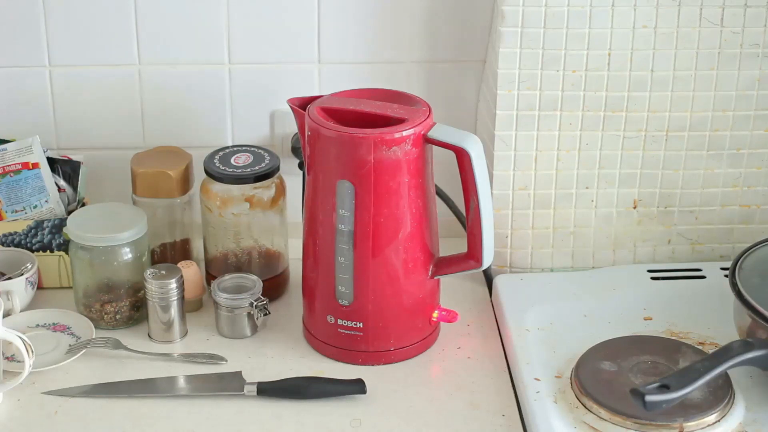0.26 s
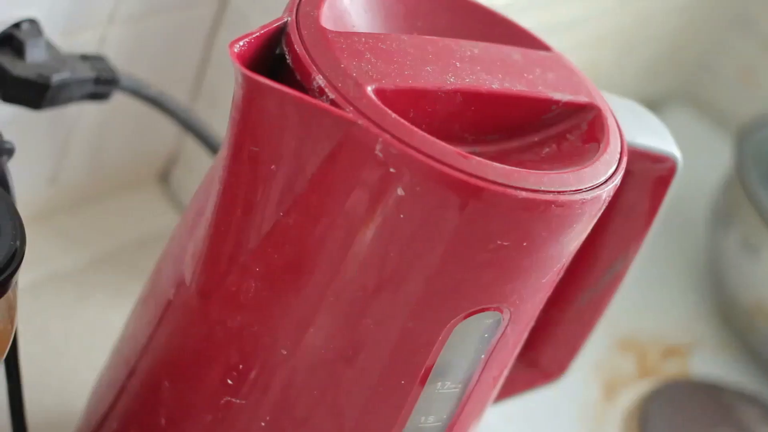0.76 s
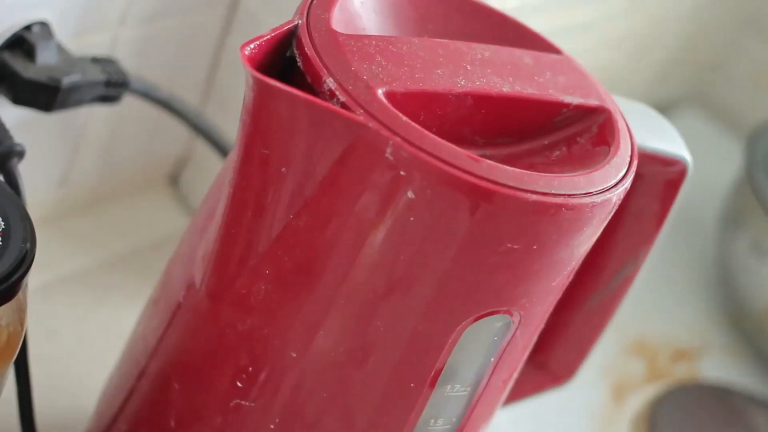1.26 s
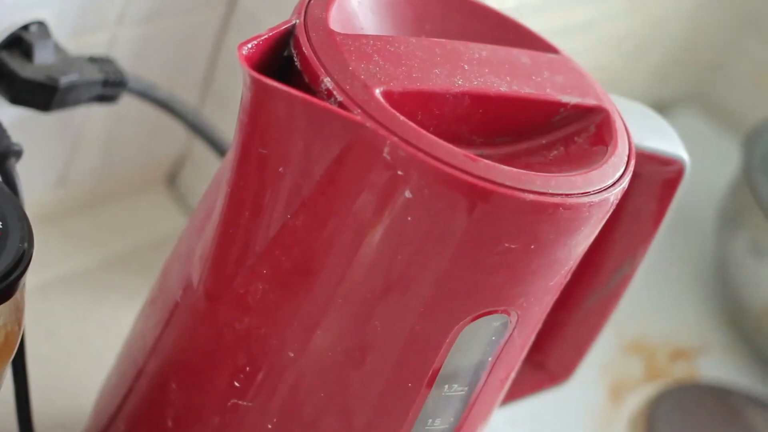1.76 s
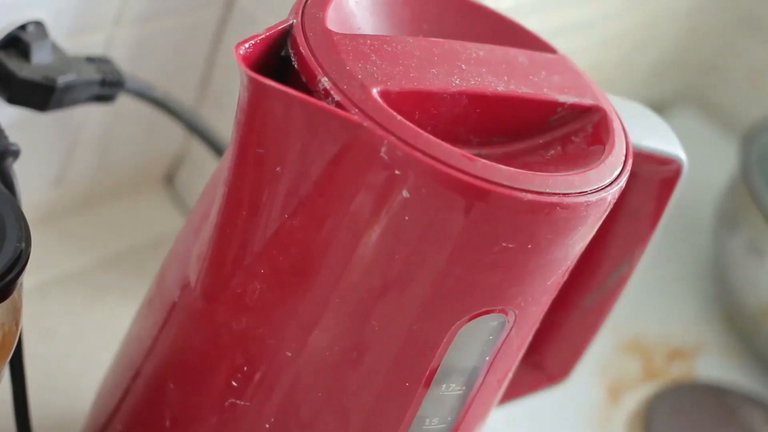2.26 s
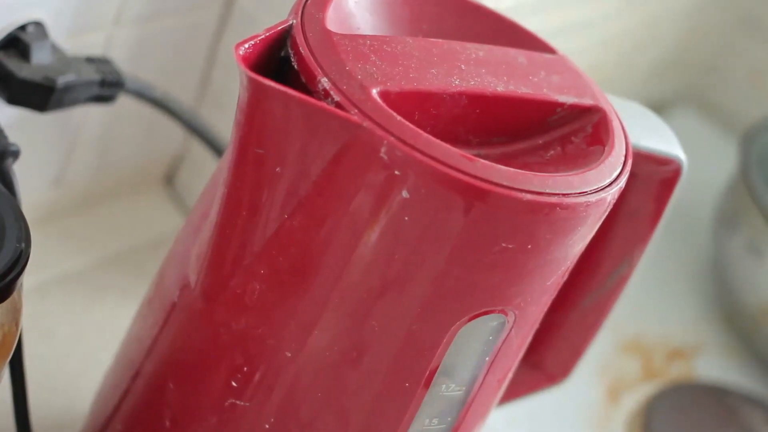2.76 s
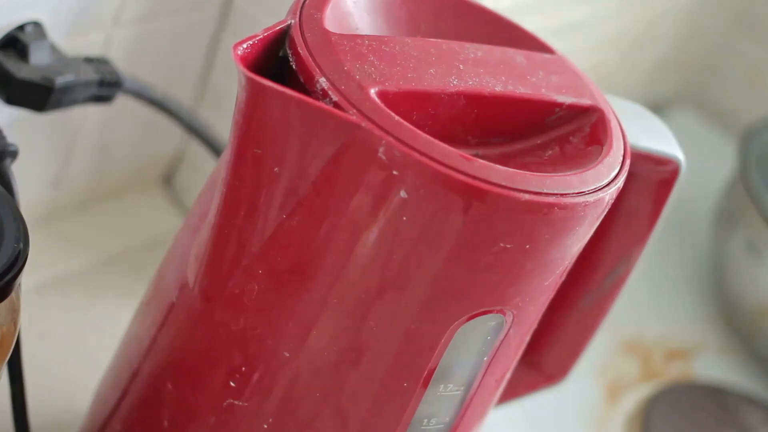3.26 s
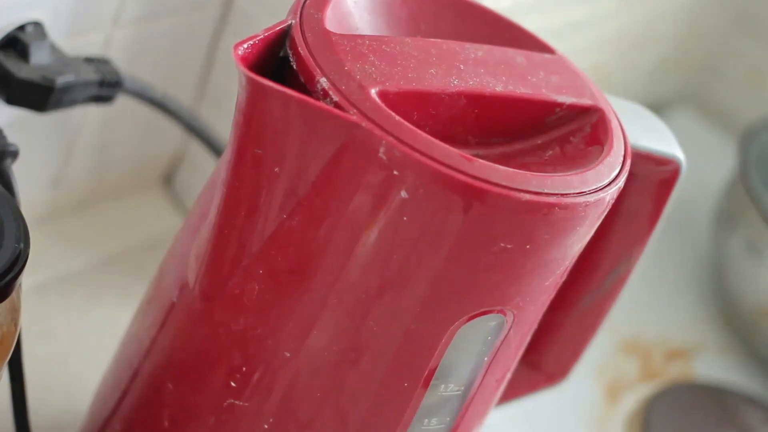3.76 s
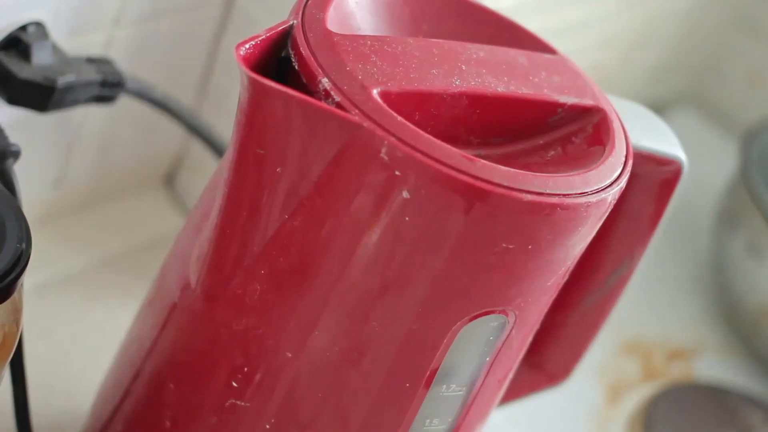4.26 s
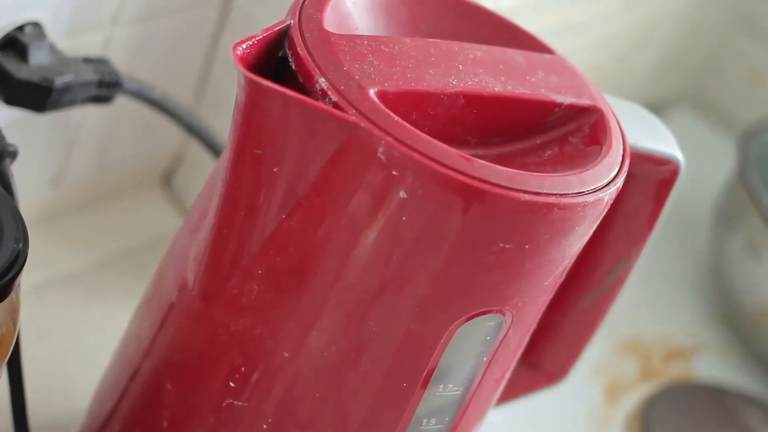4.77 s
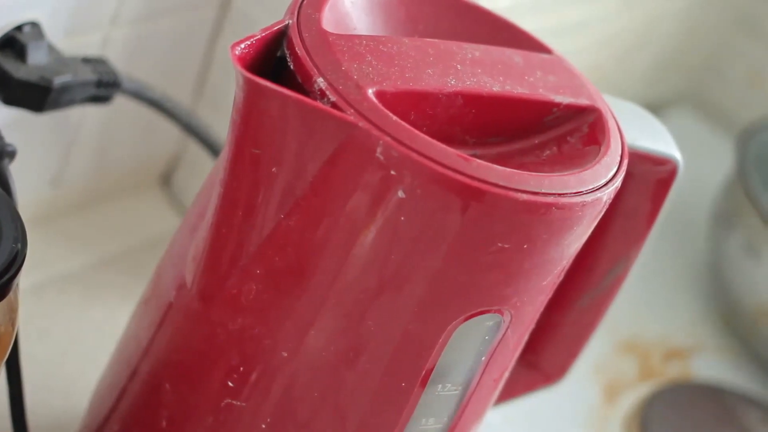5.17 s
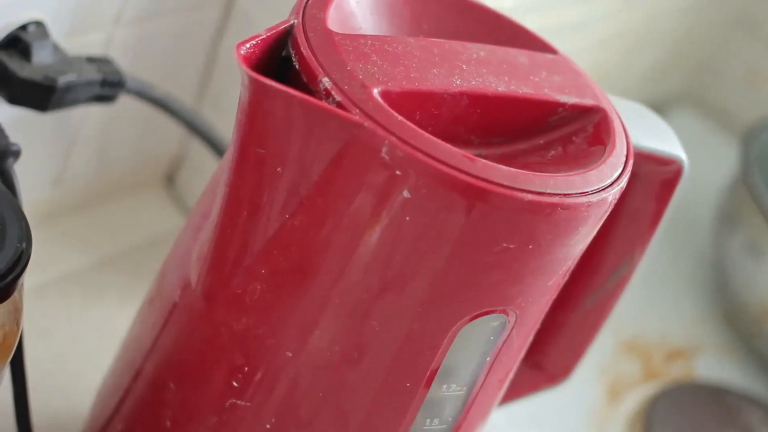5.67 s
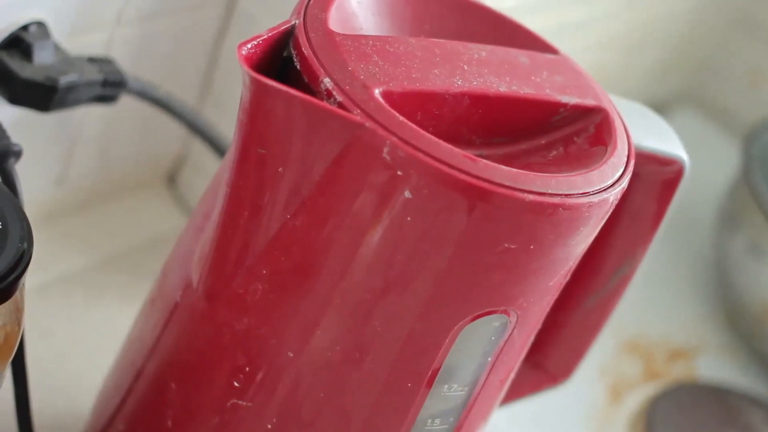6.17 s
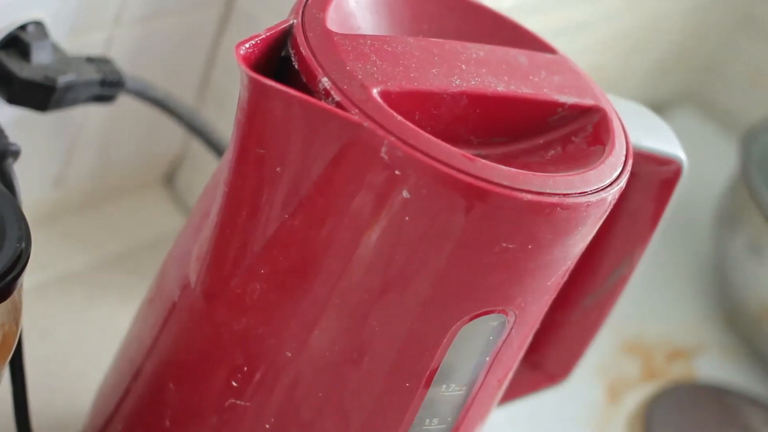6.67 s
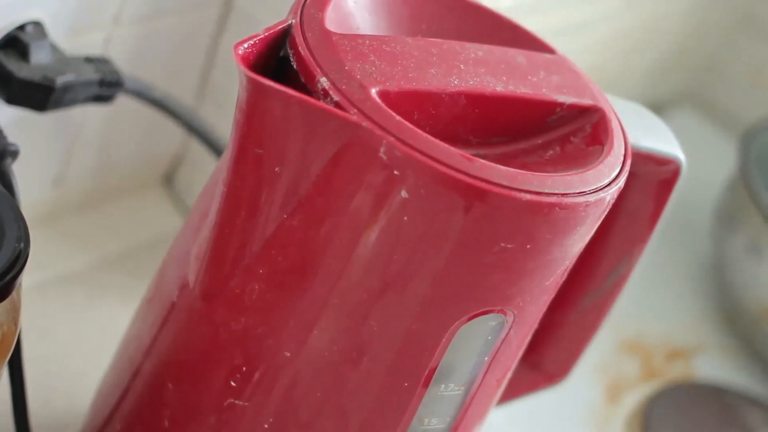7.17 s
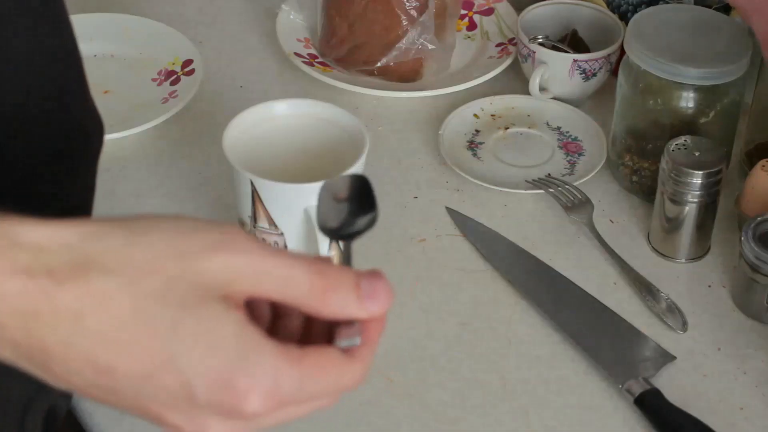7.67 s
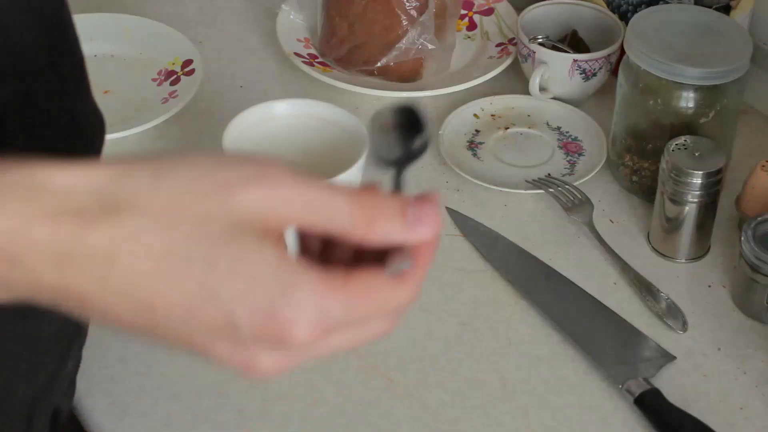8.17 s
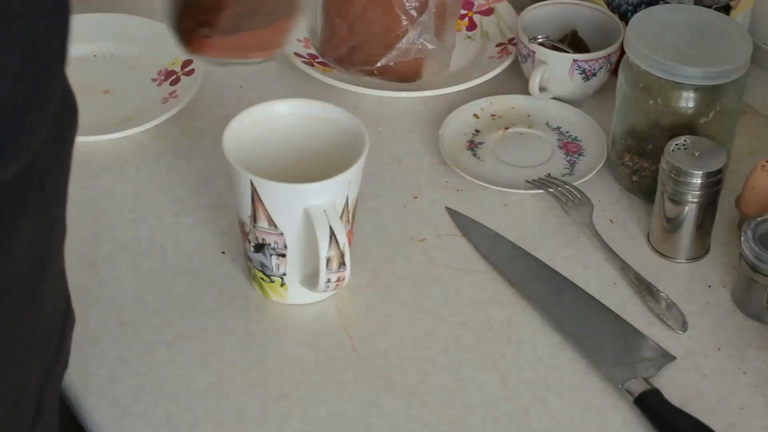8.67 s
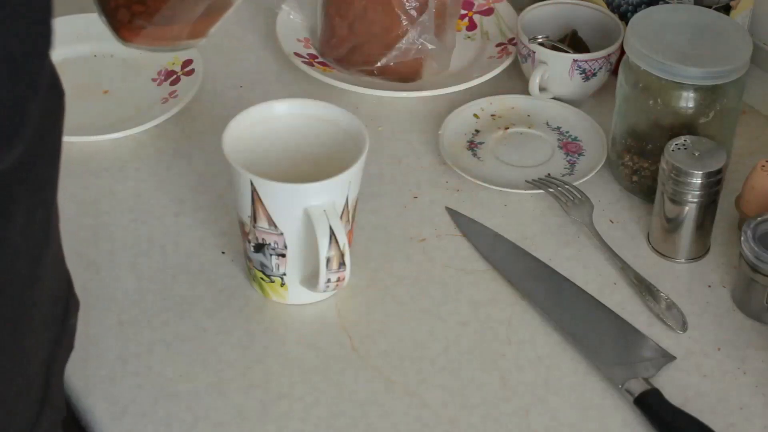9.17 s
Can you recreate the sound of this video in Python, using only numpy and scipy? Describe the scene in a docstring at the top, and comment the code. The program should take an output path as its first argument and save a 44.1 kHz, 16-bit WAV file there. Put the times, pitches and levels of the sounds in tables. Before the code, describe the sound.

In a small tiled kitchen, a boiling electric kettle is heard briefly from across the room as a smooth rush, then abruptly close: heavy low rumble, plopping bubbles, splashes and thin steam hiss. Its switch snaps off loudly with a short echo, steam gushes, and the boil gradually weakens. A sudden cut leaves a quiet room hum, soft hand rustles and small sharp clicks of a spoon and jar.

```python
"""A plastic kettle boils in a tiled kitchen: first a smooth rush of noise, heard from across the room.
Then close by: noise bursts make the rumble and splashes, short rising tones pop, low rings thump, steam hisses.
Its switch snaps with short noise bursts and an echo; the steam gushes and sings in narrow bands as the boil fades.
The sound then cuts to the quiet kitchen's hum, where hands handle a spoon and a jar:
soft thuds and rustles of filtered noise, and ticks and snaps made of blows that stir resonances."""
import sys
import numpy as np
from scipy import signal
from scipy.fft import rfft, irfft, next_fast_len
from scipy.io import wavfile
from scipy.ndimage import uniform_filter1d, map_coordinates

SR = 44100
rng = np.random.default_rng(int(sys.argv[2]) if len(sys.argv) > 2 else 0)


def generate_wav(signal):
    """Clip the signal to [-1, 1] and save it as 16-bit WAV at the path in sys.argv[1]."""
    frames = np.transpose(np.atleast_2d(signal))
    scaled = np.clip(frames, -1, 1) * 32767
    pcm = np.round(scaled).astype(np.int16)
    wavfile.write(sys.argv[1], SR, pcm)


N = 415422  # length in samples

CLOSE_S, QUIET_S = .533, 7.304  # start of the close kettle and of the quiet kitchen
SPLASH_FOLLOWS = 0.73  # splashes and chance pops fade this many dB per dB of vigour

# How hard the water boils: t/s, rumble level/dB (before swells, dips and sway)
VIGOUR = [(.55, -30.5), (1.6, -28.5), (2.6, -29.5), (3.6, -31), (4.6, -32.5), (5.6, -34.5), (6.5, -37),
          (7.3, -38.5)]
# Bubbles bursting at set times: t/s, level/dB, starting f/Hz, chirp level/dB, chirp starting f/Hz, spray level/dB
# (chirp and spray count from the burst's own level)
POPS = [(0.5517, -36, 517, -11, 1510, -34), (0.573, -33, 810.0, -13.0, 3590.0, -26.0),
        (0.594, -25, 1440, -8, 2310, -27.0), (0.6086, -36, 1680.0, -12.0, 3000.0, -25.0),
        (0.6787, -31, 810.0, -12.0, 2420.0, -25.0), (0.719, -29.5, 610, -9, 1350, -39),
        (0.7315, -30, 1070.0, -16, 3820, -28.0), (0.8078, -28, 1340.0, -11.0, 2380.0, -31.0),
        (0.906, -23.5, 1910, -14, 2480.0, -30.0), (0.9623, -23, 1370, -5.0, 2470.0, -24),
        (1.0809, -20, 1800, -8, 3240.0, -22), (1.0927, -29, 810, -14.0, 2300.0, -28.0),
        (1.117, -26, 1090.0, -8.0, 2960.0, -28.0), (1.169, -41, 960, -6, 1460, -34),
        (1.1726, -25, 1440, -22, 2330.0, -33.0), (1.2105, -31, 810, -15.0, 2990.0, -29.0),
        (1.2257, -27, 1400.0, -14.0, 2690.0, -29.0), (1.3044, -33, 1330.0, -13.0, 2500.0, -26.0),
        (1.3185, -35, 600, -7, 1330, -34), (1.3338, -33, 950, -9, 1250, -34),
        (1.467, -21, 1800, 4.5, 2940, -26), (1.499, -29, 760, -11, 1100, -36),
        (1.533, -39, 830.0, -12.0, 2840.0, -27.0), (1.5691, -25, 573, -14, 1274, -34),
        (1.5828, -37, 1570.0, -9.0, 2190, -29.0), (1.591, -24, 690, -16, 1760, -34),
        (1.639, -29, 1850.0, -8, 2370.0, -29.0), (1.671, -22.5, 1130.0, -12.0, 2580.0, -33.0),
        (1.723, -26, 1500, -18.0, 3110.0, -33.5), (1.9086, -23.5, 1610, -5, 2440.0, -29.0),
        (1.9441, -23.5, 520, -10, 1170, -34), (2.1474, -26.5, 604, -3, 1640, -34),
        (2.205, -27, 1350.0, -5, 2810.0, -27.0), (2.2613, -25.5, 1740, -10, 2300.0, -22.0),
        (2.316, -20.5, 1060, -2, 2700.0, -24.5), (2.3159, -27, 520, -2, 1290, -34),
        (2.3364, -28, 1730.0, -3, 3370.0, -23.0), (2.375, -31, 510, -16, 1490, -34),
        (2.408, -40, 794, -15, 1480, -34), (2.4352, -26.5, 580, -13, 1160, -34),
        (2.442, -29, 1250.0, 1, 2800, -22.0), (2.4756, -26, 533, -12, 1100, -34),
        (2.5477, -23.5, 885, -13.0, 2310.0, -29.0), (2.567, -26, 1450.0, -7.0, 2200.0, -22.0),
        (2.6483, -28.5, 2060, -10.0, 2200.0, -31), (2.6656, -29, 1820.0, -13, 2380.0, -26.0),
        (2.7525, -24, 1700, -10.0, 2970.0, -25.0), (2.7989, -31, 1210.0, 1, 3270.0, -25.0),
        (2.8708, -28.0, 825, 1, 2200.0, -19), (2.8996, -28.5, 950, -14.0, 2490.0, -26.0),
        (2.9863, -25, 1550, -17, 3460.0, -28.0), (2.9995, -34, 1420.0, -15, 2200.0, -28.0),
        (3.0821, -34, 586, -18, 2400, -36), (3.114, -28, 930, -8, 2270, -34),
        (3.118, -31, 1330.0, -6, 2360.0, -30.0), (3.1748, -28, 900.0, -14.0, 2200.0, -26.0),
        (3.2116, -30, 1810.0, 3, 2500, -13.0), (3.218, -24, 770, -9, 1380, -34),
        (3.2267, -23, 1340, -14.0, 2200.0, -30.0), (3.2593, -25, 1130, -11.0, 2610.0, -24.0),
        (3.2823, -33, 1820.0, -17, 2690.0, -27.0), (3.294, -32, 650, -9, 1100, -34),
        (3.3034, -33, 1170, -14, 2370.0, -25.0), (3.3586, -30, 1490.0, -12.0, 3270.0, -25.0),
        (3.4488, -31, 750, -13, 1850, -34), (3.4705, -35, 1390.0, -7.0, 3250.0, -26.0),
        (3.494, -24.5, 925, -12.0, 2900.0, -25.0), (3.537, -29.5, 1280.0, -14.0, 2920.0, -27.0),
        (3.5422, -31, 676, -12.5, 1240, -34), (3.5514, -31.0, 1110.0, -14, 2520.0, -27.5),
        (3.5642, -32.0, 1790.0, -13.0, 3190.0, -21.0), (3.625, -24, 780, -17, 3170, -32.0),
        (3.6473, -25.5, 1410.0, -14.0, 2200.0, -28.0), (3.7135, -30, 980.0, -13, 3850.0, -27.0),
        (3.7329, -33, 2090, -15, 2200.0, -21.0), (3.753, -38, 1270.0, -7.0, 2940.0, -20.0),
        (3.8715, -39, 1000, 8, 3000.0, -19.0), (3.9022, -33.0, 1470.0, -10.0, 2200.0, -24.0),
        (3.9238, -23.5, 1860, 0, 2900, -15), (3.948, -28.5, 1930, -9, 2360.0, -24.0),
        (3.9668, -28, 795, -10.0, 2200.0, -24.5), (4.001, -26.5, 1360, -2, 2180, -27),
        (4.04, -32, 804, -11.0, 2780.0, -27.5), (4.0531, -33, 2190.0, -10, 2200.0, -24.0),
        (4.087, -25, 920, -3, 3950.0, -13), (4.103, -31, 1050, -7.5, 3020.0, -28.0),
        (4.1216, -23.5, 826, 1, 2220.0, -15), (4.2653, -33, 1590.0, -8.0, 2440.0, -23.0),
        (4.295, -39, 1110.0, -12.0, 3190.0, -25.0), (4.3856, -28.5, 645, -9, 1180, -34),
        (4.3876, -36, 1170.0, -16.0, 2700.0, -23.0), (4.404, -28, 1410.0, -9.0, 2270.0, -27.0),
        (4.426, -32, 1340.0, -9, 2770.0, -24.0), (4.449, -32.5, 1320.0, -16.0, 2480.0, -24.5),
        (4.5281, -36, 1310.0, -10.0, 2200.0, -26.0), (4.5547, -38, 2200.0, 2, 2300.0, -20.0),
        (4.6001, -30.0, 1730.0, -11, 2490.0, -25.0), (4.6232, -27.0, 870, 2, 2340, -14),
        (4.7851, -35, 610, -16, 1480, -34), (4.7902, -47, 1340.0, -13.0, 4290.0, -23.0),
        (4.8574, -28.5, 920, -11.0, 2240.0, -27.0), (4.9, -33, 1270, -18, 2270.0, -27.0),
        (4.9848, -28, 825, -15.0, 2980.0, -28.5), (5.0207, -28, 800.0, -17.0, 3910.0, -22.0),
        (5.0371, -35, 1500, -11, 2260.0, -22.0), (5.0534, -31, 1780, -12.0, 2410.0, -26.0),
        (5.1248, -30, 1520.0, -15.0, 2290.0, -28.0), (5.211, -36, 1340.0, -13.0, 2200.0, -27.0),
        (5.222, -32, 1050, -18.0, 2410.0, -30.0), (5.2397, -37, 1030, -16, 2300.0, -23.0),
        (5.3117, -31, 656, -13, 1400, -34), (5.375, -29, 1500, -18, 2930.0, -25.0),
        (5.423, -35, 1860.0, -12.0, 2230.0, -24.0), (5.455, -28.5, 850.0, -10.0, 2360.0, -27.0),
        (5.482, -29, 950, -8, 1230, -34), (5.4852, -36, 1730.0, -10.5, 2720.0, -27.5),
        (5.5335, -28.5, 1080, -4, 2370.0, -24.0), (5.6649, -32, 520, -10, 1420, -34),
        (5.687, -33.5, 1730.0, 6, 3900, -16.0), (5.8175, -32.5, 1080, -4, 2510.0, -32.0),
        (5.869, -30, 1350.0, -13, 2210.0, -24.0), (5.9598, -33, 550, -13, 2410, -34),
        (5.9762, -44, 1980.0, -10.0, 3890.0, -19.0), (6.0253, -36, 1060, -9.0, 3910.0, -27.0),
        (6.064, -34, 1830, -9.0, 2280.0, -26.0), (6.086, -32.5, 1720.0, -6.5, 2200.0, -14.0),
        (6.1092, -43, 1140.0, -9.0, 2530.0, -23.0), (6.1332, -31, 517, -13, 1550, -34),
        (6.1563, -36, 1440.0, -9.0, 2780.0, -27.0), (6.1813, -29.5, 1260, -6, 2520, -23.0),
        (6.2217, -39, 1640, -15.0, 2200.0, -25.0), (6.2617, -30.5, 800, 9, 1590, -24),
        (6.377, -40, 1500, 5, 5000, -14), (6.3423, -28, 1870, 3, 3050.0, -5),
        (6.393, -37, 1230.0, -13.0, 2200.0, -25.0), (6.4237, -34, 580, -14, 1250, -34),
        (6.431, -36.0, 800.0, -12.0, 2920.0, -25.0), (6.4456, -40, 1170.0, -6.0, 2200.0, -22.5),
        (6.475, -32, 613, -20, 1290, -34), (6.486, -41, 640, -17, 1610, -34),
        (6.573, -39, 1240, -14.0, 2480.0, -24.0), (6.6779, -31, 830.0, -14.0, 2210.0, -24.0),
        (6.693, -32, 1780.0, -10.0, 2470.0, -23.0), (6.713, -31, 1390.0, -11, 2200.0, -22.0),
        (6.7334, -28.5, 940.0, -13.0, 2490.0, -31.0), (6.878, -31, 1420, -2, 2350.0, -15),
        (6.958, -28, 1300, -1.5, 2500, -28), (6.9761, -40, 1450.0, -4.0, 2830.0, -20.0),
        (7.0814, -32, 950, -8, 1330, -34), (7.086, -34.5, 1290.0, 7, 2470, -10),
        (7.1293, -35, 1310, -20.0, 3800.0, -30.0), (7.1458, -35, 577, -18, 1300, -34),
        (7.1524, -49, 1350, -15.0, 2550.0, -22.5), (7.1654, -41, 650, -16, 1710, -34),
        (7.277, -44, 806, -12.0, 2230.0, -23.0)]
# Contacts of the switch: t/s, starting level/dB, time to fall 60 dB/s, tilt/dB per octave
SWITCH = [(1.7337, -26, 0.03, -1), (1.7347, -15, 0.064, 3), (1.7384, -5, .014, -.3), (1.7396, -3, 0.016, 2),
          (1.7416, -3, 0.0065, -4), (1.744, -10, 0.019, -1.5)]
SWITCH_OFF_S = SWITCH[0][0]


def amp(db):
    """Turns decibels into a plain gain."""
    return 10 ** (np.asarray(db) / 20)


def unit(x):
    """x scaled to an average (rms) strength of 1."""
    return x / np.sqrt(np.mean(x ** 2) + 1e-20)


def along(points, hz):
    """Reads a curve of (f/Hz, value) points on a log frequency axis."""
    f, v = np.transpose(points)
    return np.interp(np.log(hz + 1), np.log(f + 1), v)


def curves(rows):
    """One value per sample for each column after the time."""
    s, *cols = np.transpose(rows)
    return [np.interp(np.arange(N) / SR, s, c) for c in cols]


def wobble(rate):
    """A smooth random curve around 0, with rate random knots a second."""
    knots = rng.standard_normal(int(N * rate / SR) + 4)
    return map_coordinates(knots, [np.arange(N) * rate / SR])


def swell(s, rise_s, fall_s):
    """A smooth bump of height 1 that peaks at s."""
    late = np.arange(N) / SR - s
    return np.exp(-(late / np.where(late < 0, rise_s, fall_s)) ** 2)


def filtered(x, response):
    """Weights each frequency of x by a response; the padding keeps the end from wrapping round."""
    m = next_fast_len(len(x) + 8192)
    return irfft(rfft(x, m) * response(np.fft.rfftfreq(m, 1 / SR)), m)[:len(x)]


def coloured(x, spectrum):
    """x weighted by the spectrum, rms 1; nothing is kept outside its ends."""
    inside = lambda hz: (hz > spectrum[0][0]) & (hz < spectrum[-1][0])
    return unit(filtered(x, lambda hz: amp(along(spectrum, hz)) * inside(hz)))


def flattened(x):
    """x with its long-term spectrum evened out, ready for a new colour."""
    spectrum = rfft(x)
    smooth_size = uniform_filter1d(np.abs(spectrum), size=2000)
    return unit(irfft(spectrum / (smooth_size + 1e-9), len(x)))


def resonance(hz, width_hz):
    """A body that rings around hz, passing little on both sides."""
    return lambda f: (1j * f * width_hz / (hz * hz - f * f + 1j * f * width_hz)) ** 2


def bands(modes):
    """The summed response of resonances: f/Hz, width/Hz, level/dB."""
    return lambda f: sum(amp(db) * resonance(hz, width_hz)(f) for hz, width_hz, db in modes)


def bursts(count, life_s, spread_db):
    """White noise broken into sudden, dying bursts of unequal size."""
    when, size = rng.random((count, 2)).T
    powers = amp(-spread_db * np.log(0.034 + size)) ** 2
    starts = np.bincount((when * N).astype(int), powers, N)
    power = signal.lfilter([1], [1, -np.exp(-1 / (max(life_s, 1e-4) * SR))], starts)
    return unit(np.sqrt(power) * rng.standard_normal(N))


def add(track, s, sound):
    """Mixes a sound into the track at time s."""
    part = track[round(s * SR):][:len(sound)]
    part += sound[:len(part)]


def echo(sound):
    """The tiled walls answer with fading noise; each frequency dies at its own speed."""
    # f/Hz, time to fall 60 dB/s
    room = [(300, 0.35), (1000, 0.3), (3000, 0.36), (8000, 0.24), (15000, 0.14)]
    hz, t, z = signal.stft(rng.standard_normal(SR // 2), SR, nperseg=256)
    fade = amp(-60 * t / along(room, hz)[:, None])
    tail = signal.istft(z * fade, SR, nperseg=256)[1]
    delayed = np.pad(sound, (220, 0))  # the walls answer 5 ms later
    return signal.fftconvolve(delayed, tail / np.linalg.norm(tail))


def distant_boil():
    """Across the room the walls smooth the boil into a steady rush with faint thin bands."""
    # Colour of the rush: f/Hz, relative level/dB per Hz
    rush_colour = [(15, -64), (25, -46), (59, -6), (99, -9), (118, -2), (146, -19), (175, 3), (208, 1),
                   (236, -10), (293, 2), (344, -14), (385, -8.5), (440, -5), (480, -16), (527, -12),
                   (714, -19.5), (1790, -24.5), (2690, -36), (6050, -41), (7710, -44), (16000, -58)]
    # Faint thin bands: f/Hz, width/Hz, relative level/dB
    whine_bands = [(3780, 140, -9), (5650, 170, -8), (6460, 230, -9), (7660, 45, -1), (7830, 60, -3)]
    whine = amp(-72) * unit(filtered(rng.standard_normal(N), bands(whine_bands)))
    level_db = -39 + .6 * wobble(10)
    return amp(level_db) * coloured(rng.standard_normal(N), rush_colour) + whine


def droplets(count, centre_hz, scatter, cycles, spread_db):
    """Many tiny bubbles in clusters, each ringing a few cycles at its own pitch."""
    when, size = rng.random((count, 2)).T[:, :, None]
    share = np.cumsum(amp(2.4 * wobble(45)))  # bubbles crowd where this climbs fast
    start = np.searchsorted(share, when * share[-1])
    hz = np.clip(centre_hz * np.exp(scatter * rng.standard_normal((count, 1))), 300, 15000)
    step = np.arange(300)  # samples within one ring
    turns = hz * step / SR
    strength = amp(-spread_db * np.log(0.0046 + size)) * np.sqrt(hz)
    ring = strength * np.sin(2 * np.pi * turns) * np.exp(-turns / cycles)
    return unit(np.bincount((start + step).ravel(), ring.ravel(), N + 301)[:N])


def wake():
    """Gain of the churning water that starts with each burst in POPS and settles."""
    wake_db, settle_s = -11, 0.016  # under the burst's level
    s, db = np.transpose(POPS)[:2]
    starts = np.bincount((s * SR).astype(int), amp(db + wake_db) ** 2, N)
    return np.sqrt(signal.lfilter([1], [1, -np.exp(-2 / (settle_s * SR))], starts))


def rumble(calm_db):
    """Steam bubbles collapse low in the water and shake the kettle; its lowest part fades more slowly."""
    # Water and kettle wall: f/Hz, relative level/dB per Hz
    water_colour = [(13, -51), (22, -23.5), (64, -5.5), (98, -12), (129, -2), (196, -3.5), (237, -2),
                    (277, -2), (360, -6.5), (414, -7), (447, -8.5), (556, -13.5), (592, -12), (713, -20),
                    (900, -22.5), (1170, -40), (1980, -120)]
    # Kettle and counter resonances: f/Hz, width/Hz, level over the rumble/dB
    shell_modes = [(76.5, 38, -5), (132.6, 8, 1), (234.3, 14, .6), (411, 20, 1), (469, 27, -5),
                   (593, 36, -12.5)]
    deep_hz, body_hz = 99.4, 190
    deep_holds, body_fades = 0.51, 0.35  # share of the fade escaped; extra share of it
    knocks = bursts(count=4000, life_s=0.0046, spread_db=-0.2)
    water = coloured(knocks + 1.22 * rng.standard_normal(N), water_colour)
    thump = unit(water + filtered(water, bands(shell_modes)))
    deep = filtered(thump, lambda hz: hz < deep_hz)
    body = filtered(thump, lambda hz: (hz >= deep_hz) & (hz < body_hz))
    return thump + (amp(-deep_holds * calm_db) - 1) * deep + (amp(body_fades * calm_db) - 1) * body


def boil():
    """The rumble swells and dips, the splashes follow a moment later, and steam hisses above."""
    # Swells and dips of the rumble: t/s, level change/dB
    rumble_changes = [(0.579, 7.5), (.74, 2), (.97, 3.5), (1.1, 2.5), (1.31, 3), (1.4, 2), (1.53, 5),
                      (1.62, 5.5), (1.79, 0), (1.96, 1), (2.14, 4), (2.278, 6), (2.419, 0), (2.57, 5),
                      (2.73, 4), (2.87, 0.5), (3.11, 5.5), (3.18, 5), (3.27, 2), (3.39, 2.5), (3.54, 0),
                      (3.84, -4), (4.0, 4), (4.28, -2), (4.37, -3), (4.49, 1), (4.9, 3.5), (5.0, 5),
                      (5.89, -1), (6.06, 3.5)]
    # Colour of the splashes: f/Hz, relative level/dB per Hz
    splash_colour = [(290, -30.5), (500, -1), (597, -7), (712, -6.5), (1130, -9), (1320, -9), (1740, -12.5),
                     (4970, -31), (7000, -39), (9100, -62.5), (15400, -120)]
    # Colour of the steam: f/Hz, relative level/dB per Hz
    steam_colour = [(2060, -27.5), (3500, -8), (3900, -3.5), (5000, -8), (7180, -3), (7560, -4), (8210, -9),
                    (8910, -8.5), (9810, -17), (10700, -16), (12500, -17.5), (13500, -21.5), (14300, -16.5),
                    (15100, -21), (16000, -42.5)]
    # Bands that the steam sings in: f/Hz, width/Hz, level over the hiss/dB (at full boil)
    spout_bands = [(7670, 180, -5), (8650, 200, -3.5), (10600, 170, 0.5), (13300, 220, 2), (13900, 220, 1),
                   (14690, 250, 1)]
    splash_lag_s, splash_share = 0.038, 0.31  # the surface breaks after the thump
    steam_follows, sing_follows = 0.65, .9  # dB per dB of vigour

    vigour_db, = curves(VIGOUR)
    calm_db = vigour_db - VIGOUR[0][1]  # relative to the level at the start
    change_db = sum(db * swell(s, rise_s=0.0045, fall_s=0.017) for s, db in rumble_changes)
    breaking_db = splash_share * np.roll(change_db, round(splash_lag_s * SR))
    heave = wobble(15)
    rumble_db = vigour_db + change_db + 0.21 * heave + 1.3 * wobble(7)

    fizz = flattened(droplets(count=9000, centre_hz=2053, scatter=.9, cycles=1.9, spread_db=2.5))
    splash = coloured(fizz + rng.standard_normal(N), splash_colour)
    splash_db = -41.5 + SPLASH_FOLLOWS * calm_db + breaking_db + .4 * heave + .7 * wobble(9)
    splash_gain = np.hypot(amp(splash_db), wake())

    steam = coloured(0.33 * fizz + rng.standard_normal(N), steam_colour)
    heater_off = np.arange(N) / SR > SWITCH_OFF_S
    # once the heater is off the spout sings with a flicker
    sing_gain = heater_off * amp(sing_follows * calm_db + 5 * wobble(24))
    steam = steam + sing_gain * filtered(steam, bands(spout_bands))
    # the steam gushes at the switch, then settles to a smaller boost
    gush_db = heater_off * (2.5 + 2 * swell(SWITCH_OFF_S, rise_s=0.14, fall_s=0.14))
    steam_db = -60.5 + steam_follows * calm_db + gush_db + 0.43 * heave + .9 * wobble(30)
    return amp(rumble_db) * rumble(calm_db) + splash_gain * splash + amp(steam_db) * steam


def chance_pops(count):
    """More bursts in rows like those of POPS, at chance moments and following the vigour of the boil."""
    when, size, pitch, upper, wet = rng.random((count, 5)).T
    s = CLOSE_S + when * (QUIET_S - CLOSE_S)
    calm_db = np.interp(s, *np.transpose(VIGOUR)) - VIGOUR[0][1]
    db = -35 + SPLASH_FOLLOWS * calm_db - 3.5 * np.log(0.12 + size)
    hz = 1340 * 1.5 ** (2 * pitch - 1)
    chirp_db = -8 + 12 * (wet - .5)
    chirp_hz = 3000 * 0.9 ** (2 * upper - 1)
    spray_db = -17 + 16 * (wet - .5)
    return list(zip(s, db, hz, chirp_db, chirp_hz, spray_db))


def pops():
    """A burst bubble rings briefly, rising in pitch; a chirp sounds too, the surface tears and spits spray."""
    bubble_cycles, chirp_cycles = 2.1, 2.4  # how long they ring
    tear_s, spray_s = 0.02, 0.008  # time to fall 60 dB
    track, t = np.zeros(N), np.arange(SR // 30) / SR
    for s, db, hz, chirp_db, chirp_hz, spray_db in list(POPS) + chance_pops(count=45):
        bubble = np.sin(2 * np.pi * hz * t * (1 + 40 * t)) * np.exp(-t * hz / bubble_cycles)
        chirp = np.sin(2 * np.pi * chirp_hz * t * (1 + 30 * t)) * np.exp(-t * chirp_hz / chirp_cycles)
        tear = filtered(rng.standard_normal(len(t)) * amp(-60 * t / tear_s), resonance(1.17 * hz, 1.1 * hz))
        spray = filtered(rng.standard_normal(len(t)) * amp(-60 * t / spray_s), resonance(5200, 7000))
        burst = bubble + amp(chirp_db) * chirp
        burst += .5 * tear / np.abs(tear).max()
        burst += amp(spray_db) * spray / np.abs(spray).max()
        soft_start = 1 - np.exp(-t / 0.00037)
        add(track, s, amp(db) * soft_start * burst)
    return track


def collapses():
    """A bubble that slams shut knocks the water: a sudden, short low ring."""
    # Single steam bubbles: t/s, level before the soft start/dB, f/Hz, ring length/cycles
    shut_bubbles = [(0.586, -34, 243, 5.7), (0.631, -22.5, 254, 3), (0.677, -15, 227, 2.7),
                    (0.723, -13, 238, 2.5), (0.891, -21, 272, 2.1), (0.949, -22.5, 274, 7.3),
                    (1.072, -21, 329, 5.9), (1.106, -14, 290, 2.2), (1.184, -20, 243, 3.1),
                    (1.302, -16, 260, 4.3), (1.398, -10.5, 279, 1.15), (1.523, -15.5, 260, 2.4),
                    (1.572, -19.5, 246.6, 9.9), (1.621, -18, 247, 2.3), (1.955, -23, 272, 6.4),
                    (2.026, -25, 263, 1.5), (2.123, -17.5, 255, 4.6), (2.157, -26, 249, 6.6),
                    (2.236, -28, 346, 2), (2.269, -30, 247, 5.7), (2.404, -15, 240, 1.9),
                    (2.442, -27, 256, 1.9), (2.567, -22, 273, 3.6), (2.844, -17.5, 240, 5),
                    (2.881, -34, 235, 5.4), (3.105, -11, 264, 1.5), (3.172, -12.5, 258, 3),
                    (3.252, -17, 255, 3.4), (3.291, -22, 258, 5.2), (3.377, -14, 271, 2.4),
                    (3.425, -25.5, 310, 7.5), (3.557, -30, 318, 7.7), (3.635, -25, 222, 4.9),
                    (3.775, -22, 267, 2.6), (3.834, -17.5, 265, 3.7), (3.994, -14, 247, 2.1),
                    (4.052, -23, 330, 2.2), (4.083, -26, 287, 2.1), (4.198, -19, 285, 2.5),
                    (4.234, -20.5, 244, 3.5), (4.277, -18.5, 244, 5.4), (4.355, -24, 242, 5.6),
                    (4.501, -22.5, 273, 6.6), (4.621, -25, 282, 5.8), (4.836, -27, 238, 3.2),
                    (4.887, -21, 275, 5.3), (5.011, -24, 254, 4.1), (5.049, -23, 233, 4),
                    (5.404, -25, 255, 4.2), (5.465, -24, 172, 1), (5.487, -24, 253, 1.9),
                    (5.626, -28, 285, 1.9), (5.797, -38, 256, 1.6), (5.89, -23, 257, 3.9),
                    (5.977, -20, 285, 2.1), (6.049, -31, 279, 5.6), (6.237, -40, 269, 1.6),
                    (6.297, -24, 265, 1.7), (6.418, -29, 251, 6.3), (6.484, -25, 215, 1.8),
                    (6.716, -20.5, 274, 1.7), (6.783, -31, 267, 5.8), (6.822, -27, 324, 2.4),
                    (6.951, -26, 304, 2.7), (6.996, -37, 172, 1.1), (7.086, -27, 285, 4.3),
                    (7.123, -33, 247, 2.4), (7.212, -29, 312, 4.8), (7.237, -35, 273, 5.7),
                    (7.282, -22, 274, 2.1)]
    track, t = np.zeros(N), np.arange(SR // 10) / SR
    for s, db, hz, cycles in shut_bubbles:
        ring = np.sin(2 * np.pi * hz * t) * np.exp(-t * hz / cycles)
        soft_start = 1 - np.exp(-t / 0.0029)
        add(track, s, amp(db) * ring * soft_start)
    return track


def switch():
    """The lever lets go, slams on its stop and bounces; the kitchen and the housing ring after the slam."""
    # Colour of the lever: f/Hz, relative level/dB per Hz
    lever_colour = [(150, -33), (250, -9.5), (414, 7), (698, -15.5), (1610, 2), (2760, -5.5), (3340, 8),
                    (3840, -11), (4340, 2.5), (5830, -6), (6700, -2.5), (11700, -21.5), (16000, -32.5)]
    # What the walls return of the slam: f/Hz, relative level/dB per Hz
    slam_colour = [(200, -28), (340, -10), (468, 9), (750, -9), (1170, 2.5), (1400, -2), (1660, 4.5),
                   (1950, -5.5), (2240, 0.5), (2800, -8), (3400, -8.5), (4740, -12), (8000, -17.5),
                   (16000, -34.5)]
    # What the slam leaves ringing: f/Hz, starting level/dB, time to fall 60 dB/s
    housing_modes = [(467, -21.5, .2), (1160, -28, .2), (1587, -26, .25), (2026, -29, .18),
                     (2213, -30, 0.17), (2589, -28.5, .25), (4727, -33, .15), (5150, -29.5, 0.15),
                     (6616, -35, .2), (7558, -33, .15)]
    slam_s = SWITCH[2][0]
    track, t = np.zeros(N), np.arange(SR // 20) / SR
    for s, db, t60, tilt_db in SWITCH:
        colour = [(hz, level + tilt_db * np.log2(hz / 3000)) for hz, level in lever_colour]
        add(track, s, coloured(rng.standard_normal(len(t)), colour) * amp(db - 60 * t / t60))

    ringing = filtered(echo(np.ones(1)), lambda hz: amp(along(slam_colour, hz)))
    clumps_db = 1.5 * wobble(70)[:len(ringing)]  # the echo comes back in uneven clumps
    add(track, slam_s, amp(19.0 + clumps_db) * ringing)

    t = np.arange(SR // 4) / SR
    for hz, db, t60 in housing_modes:
        tone = np.sin(2 * np.pi * (hz * t + rng.random()))
        add(track, slam_s, amp(db - 60 * t / t60) * tone)
    return track


def kitchen_hum():
    """A low appliance hum with a faint hiss, strengthened in the appliance's own bands."""
    # Colour of the quiet kitchen: f/Hz, relative level/dB per Hz
    hum_colour = [(13, -40), (22, -11), (59, -15), (90, -7.5), (106, -11.5), (128, -1), (156, -10),
                  (184, -3), (205, -10), (278, -18), (398, -21), (1810, -29), (8030, -33.5), (10900, -36.5),
                  (16000, -41)]
    # The appliance's bands: f/Hz, width/Hz, level over the hum/dB
    drone_bands = [(132.8, 12, -3), (188, 17, -9)]
    hum = amp(-61 + 0.8 * wobble(5.4)) * coloured(rng.standard_normal(N), hum_colour)
    return hum + filtered(hum, bands(drone_bands))


def rustles():
    """Moving hands rub: many tiny noise bursts, coloured four ways, swell with each stroke."""
    # Colours of scrape, squeak (a thin band that sliding metal sings in), swish and drag:
    # each lists f/Hz, relative level/dB per Hz
    scrape_colour = [(1500, -38.5), (2000, -16), (2450, -10), (2800, -9), (3150, -11), (3600, -17),
                     (4500, -33.5)]
    squeak_colour = [(2000, -30), (2600, -15), (2860, 0), (3120, -13), (3800, -30)]
    swish_colour = [(3000, -7), (4500, 0), (7000, -1), (9000, -16), (15000, -23)]
    drag_colour = [(180, -28), (280, -10), (400, 3.5), (520, 0.5), (650, -9), (900, -5), (1200, -20),
                   (1480, -10), (1750, -11), (2100, -18)]
    # Restless hands between strokes: scrape, squeak, swish and drag level/dB
    floor_db = [-94, -95, -83.5, -92]
    # Hand strokes: peak t/s, half length/s, then scrape, squeak, swish and drag level/dB
    strokes = [(7.578, 0.054, -82.5, -90, -74, -71), (7.758, 0.03, -76, -70, -73.5, -75),
               (7.815, 0.042, -67, -78, -72, -69), (7.92, 0.059, -87, -90, -82.5, -66),
               (8.243, 0.02, -76, -66.5, -76, -85), (8.306, 0.032, -76, -78, -76, -82),
               (8.353, 0.041, -85, -76, -84, -87), (8.411, .015, -80, -71, -80, -85),
               (8.435, 0.022, -61, -71, -70.5, -80), (8.788, 0.063, -71, -80, -66, -73),
               (9.09, 0.032, -67, -76, -73, -73.5), (9.157, .05, -77, -90, -74, -72.5),
               (9.31, 0.018, -62, -75, -56, -58), (9.351, 0.016, -60, -75, -64, -55),
               (9.388, 0.029, -56.5, -70, -65.5, -57.5), (9.417, 0.015, -58, -70, -66, -55)]
    colours = (scrape_colour, squeak_colour, swish_colour, drag_colour)
    rubbing = np.array([coloured(bursts(count=9000, life_s=0.004, spread_db=2.5), c) for c in colours])
    pressure = amp(floor_db)[:, None]
    for s, half_s, *parts_db in strokes:
        pressure = pressure + amp(parts_db)[:, None] * swell(s, half_s, half_s)
    return (pressure * rubbing).sum(axis=0)


def thuds():
    """A soft hand contact on the counter is a short, dull puff of noise."""
    # Soft bumps: t/s, peak level/dB, middle f/Hz, time to fall 60 dB/s (before the resonance)
    bumps = [(7.573, -53, 477, 0.075), (7.9, -52, 298, .08)]
    track, t = np.zeros(N), np.arange(SR // 8) / SR
    for s, db, hz, t60 in bumps:
        puff = filtered(rng.standard_normal(len(t)) * amp(-60 * t / t60), resonance(hz, 0.88 * hz))
        add(track, s, amp(db) * puff / np.abs(puff).max())
    return track


def ticks():
    """Small hard contacts: a sharp blow and gritty chatter stir five broad resonances, then the room."""
    # Contacts: t/s, clack f/Hz, then knock, clack, click, snap and sparkle level/dB,
    # time for the chatter to fall 60 dB/s, room level/dB
    contacts = [(7.799, 2700, -38, -24, -27, -32, -50, 0.016, 7),
                (7.803, 2400, -27, -32, -33, -27, -45, 0.014, 7),
                (7.8065, 2400, -21, -28, -33, -36, -37, 0.013, 2),
                (7.815, 2600, -23.5, -37, -42, -47, -55, .025, 5),
                (7.852, 2600, -32, -46, -46, -48.5, -60, 0.024, 10),
                (8.011, 1810, -24.5, -22, -26, -24.5, -39.5, 0.054, 13),
                (8.2707, 2760, -51, -15, -21, -18, -42, 0.0077, -6.5),
                (8.285, 3000, -55, -29, -36, -40, -60, 0.006, -3),
                (8.609, 2830, -27.5, -30, -34, -31, -45, 0.03, 10),
                (8.6112, 2900, -37, -25, -32, -25, -46, 0.02, 4),
                (8.665, 3000, -41, -18, -23, -20, -32, 0.011, 5),
                (8.675, 3100, -40, -9, -22, -25, -50, 0.007, -4),
                (8.721, 3100, -49.5, -19, -34, -48, -58, 0.0066, 8),
                (8.729, 2860, -22.5, -17, -24, -14, -17, 0.014, 7),
                (8.7395, 2780, -50, -40, -36, -24, -28, 0.008, 0),
                (8.756, 2500, -50, -19, -26, -21, -38, 0.008, 3),
                (8.7583, 2380, -45, -10.5, -18, -17, -38, 0.009, -0.5),
                (8.7706, 2400, -40, -10, -20, -28, -54, 0.01, -4),
                (9.08, 2300, -46, -24, -40, -57.5, -65, 0.013, 1),
                (9.125, 2610, -15.5, -41, -39, -36, -56, 0.0094, 3),
                (9.252, 2600, -46, -19, -26, -30, -52, 0.0087, 3),
                (9.298, 2300, -24, -31, -38, -40, -58, 0.013, 6),
                (9.301, 2700, -28, -20, -31, -33, -52, 0.012, 2),
                (9.304, 2700, -30, -17.5, -30, -35, -52, 0.012, 2),
                (9.3065, 2800, -32, -23, -33, -34, -55, 0.012, 2)]
    # Resonances of knock, click, snap and sparkle: f/Hz, width/Hz
    places_around = [(1150, 1600), (4000, 1100), (6000, 2800), (12000, 2900)]
    shade_hz = 8100  # above this the walls return little of a tick
    track, t = np.zeros(N), np.arange(SR // 15) / SR
    for s, clack_hz, knock_db, clack_db, *upper_db, t60, room_db in contacts:
        chatter = .2 * rng.standard_normal(len(t)) * amp(-60 * t / t60)
        blow = (t == 0) * 1.
        places = [places_around[0], (clack_hz, 1400), *places_around[1:]]
        levels_db = [knock_db, clack_db, *upper_db]
        # alternating signs let neighbours join without a gap
        colour = lambda f: sum((-1) ** k * amp(db) * resonance(*place)(f)
                               for k, (place, db) in enumerate(zip(places, levels_db)))
        add(track, s, filtered(blow + chatter, colour))
        shaded = filtered(blow, lambda hz: colour(hz) / (1 + 1j * hz / shade_hz) ** 2)
        add(track, s, amp(room_db) * echo(shaded))
    return track


def scene():
    """The distant boil, the close kettle and the quiet kitchen, joined by short cross-fades."""
    t = np.arange(N) / SR
    close = np.clip((t - CLOSE_S) / 0.0065, 0, 1)
    quiet = np.clip((t - QUIET_S) / 0.0017, 0, 1)
    close_kettle = boil() + pops() + collapses() + switch()
    kettle = (1 - close) * distant_boil() + close * close_kettle
    quiet_kitchen = kitchen_hum() + thuds() + rustles() + ticks()
    return ((1 - quiet) * kettle + quiet * quiet_kitchen)[None]


def record(dry):
    """Rounds off the loudest peaks smoothly, then fades out the treble just below 16.2 kHz."""
    rounded = dry[0] / (1 + np.abs(dry[0]) ** 8) ** (1 / 8)
    return filtered(rounded, lambda hz: np.clip((16200 - hz) / 500, 0, 1) ** 4)[None]


dry = scene()
out = record(dry)
generate_wav(out)
```